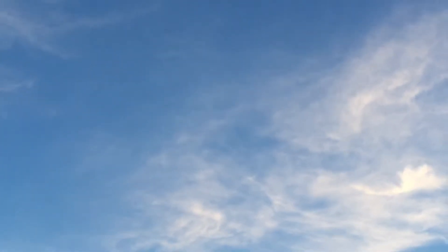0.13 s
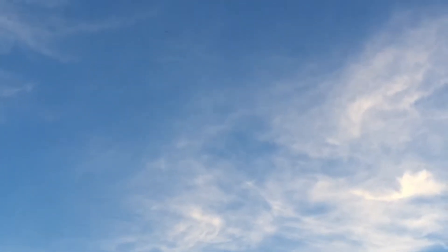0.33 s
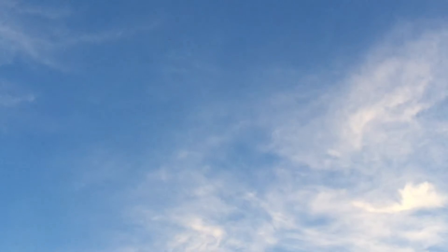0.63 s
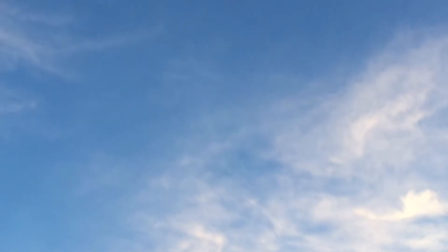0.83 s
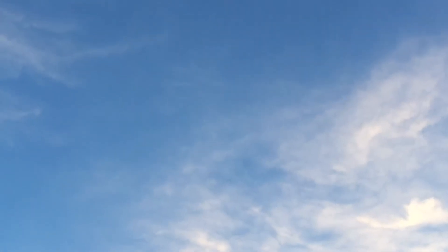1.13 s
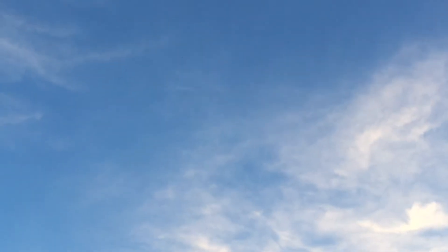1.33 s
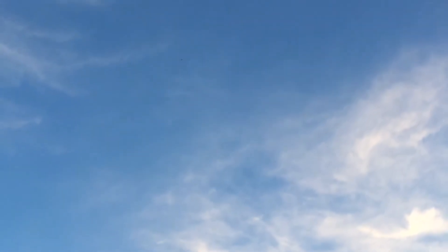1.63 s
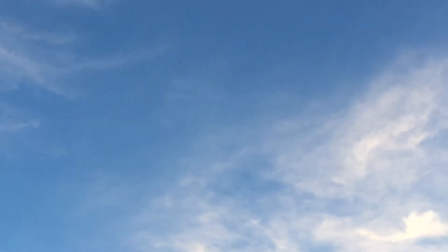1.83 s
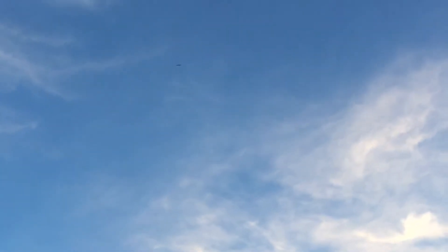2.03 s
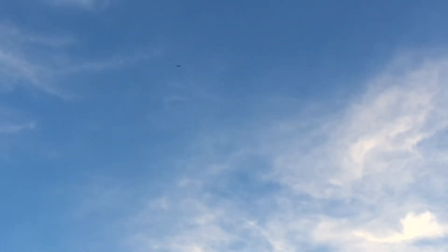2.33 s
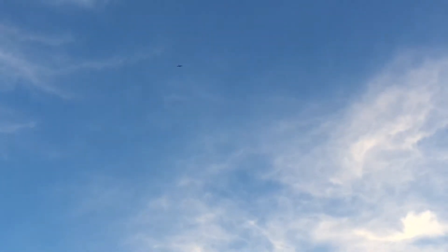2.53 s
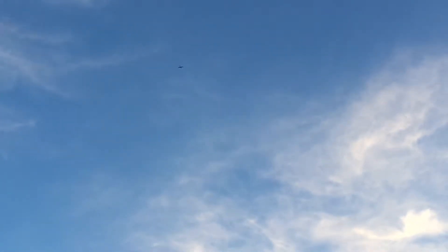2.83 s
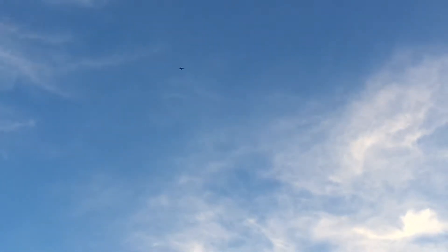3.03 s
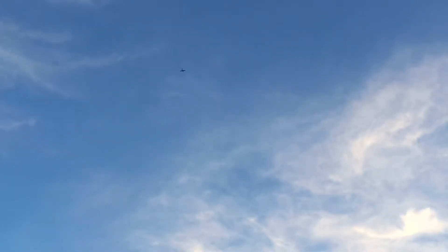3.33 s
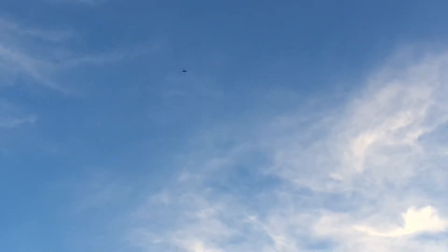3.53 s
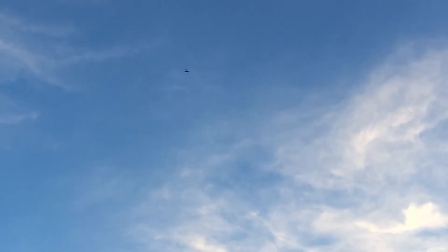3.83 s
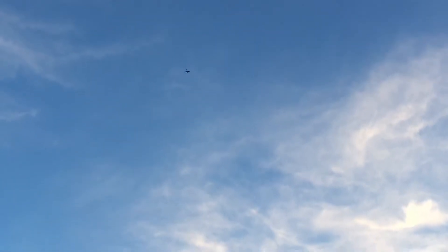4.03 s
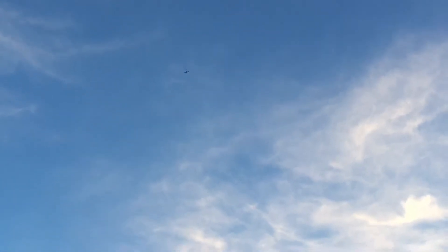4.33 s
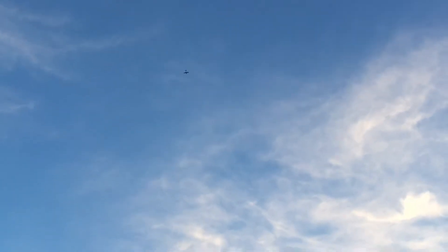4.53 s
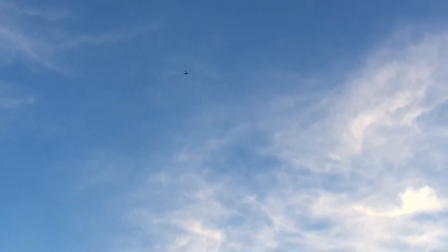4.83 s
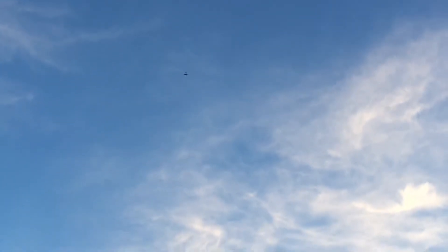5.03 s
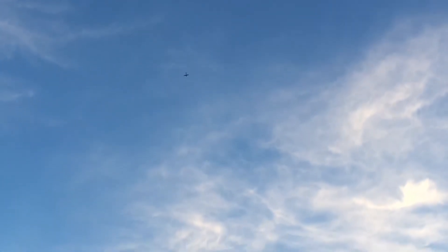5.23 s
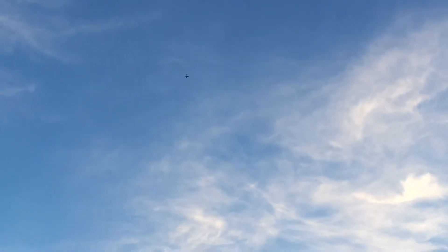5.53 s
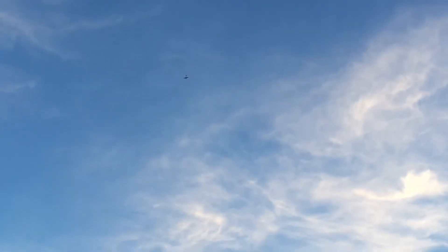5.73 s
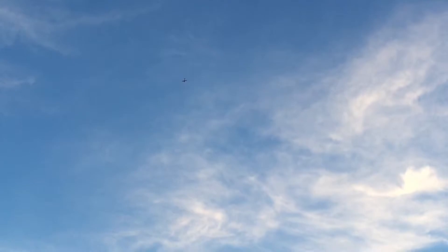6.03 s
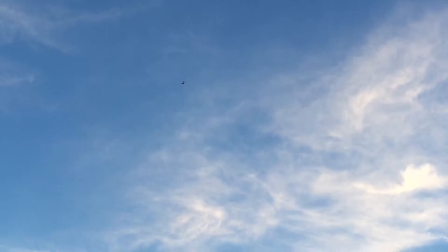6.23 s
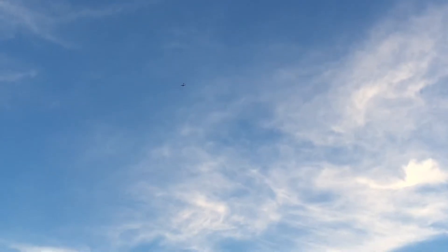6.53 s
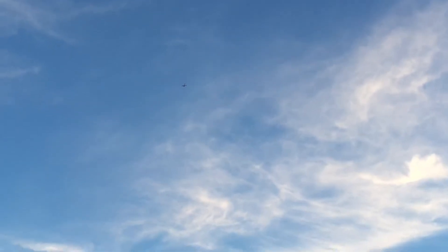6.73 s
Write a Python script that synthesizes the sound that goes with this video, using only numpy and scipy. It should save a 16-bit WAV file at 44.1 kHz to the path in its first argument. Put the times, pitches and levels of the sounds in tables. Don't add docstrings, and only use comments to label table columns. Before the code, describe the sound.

A light propeller aircraft is already droning high overhead at 0 s, heard from a quiet open field by one microphone. The low buzzing hum, around 129 firings per second, slides down smoothly to about 100 by 3 s. Propeller beating and exhaust blend into one continuous, slightly rough tone that flickers through the long air path. A thin, chirping whistle near 3.5 kHz rides on it, clearest in the first second or so and gone by about 2.4 s. Raspy exhaust crackle swells from 1.4 to 2.3 s, stays patchy and increasingly dull until about 4.5 s, then drops away. Pitch bottoms near 4 s and rises slightly to about 105 by the end at 6.9 s. The late drone is softer, smoother and muffled, with a low airframe rush slowly fading and faint steady hiss beneath. It is still sounding when it ends.

```python
import sys
import numpy as np
from scipy import signal
from scipy.fft import rfft, irfft, next_fast_len
from scipy.io import wavfile
from scipy.ndimage import uniform_filter1d

SR = 44100
rng = np.random.default_rng(int(sys.argv[2]) if len(sys.argv) > 2 else 0)


def wrap_up_sound(samples):
    columns = np.atleast_2d(samples).T
    tamed = np.clip(columns, -1, 1)
    steps = np.round(tamed * 32767).astype(np.int16)
    wavfile.write(sys.argv[1], SR, steps)


def volts_from_decibels(level):
    exponent = np.asarray(level, float) / 20
    return 10 ** exponent


N = 303400
T = np.arange(N) / SR
PADDED = next_fast_len(N)
HZ = np.fft.rfftfreq(PADDED, 1 / SR)

# (time [s], heard
# firing rate [Hz])
FIRING_RATE = [(0, 128.6), (.6, 120.05), (1.2, 112.45), (1.5, 109.1), (1.8, 106.2), (2.1, 103.8),
               (2.4, 102.1), (2.7, 100.9), (3, 100.05), (3.6, 98.75), (3.9, 98.6), (4.2, 98.7),
               (4.8, 99.55), (5.4, 100.85), (6, 102.25), (6.88, 105)]

# (time [s], blade tone [dB], edge of its second multiple [dB])
PROPELLER = [(0, -39.5, -16), (.2, -38.5, -4.5), (.6, -44, 1.5), (.85, -45.5, 8), (1.5, -45, 2.5),
             (1.8, -43, 1), (2.15, -43, -5.5), (2.5, -41, -18), (2.9, -40.5, -4), (3.4, -47.5, -3.5),
             (3.65, -47, -29), (4.4, -47, -15), (4.6, -46, -14), (5.2, -48, -11), (6, -46, -22.5),
             (6.2, -44, -13), (6.4, -39.5, -25.5), (6.88, -40.5, -21)]
# (order [per engine cycle], level followed [index], level against it [dB], flicker [dB])
BLADE_ORDERS = [
    (4, 0, 0.5, 0.5),
    (8, 1, 0.5, 4.5),
    (16, 2, 1, 2.5),
    (20, 1.4, -18, 7),
    (10, 0, -22, 4),
    (5, 0, -17, 2),
]
# (time [s], lead [firings])
BLADE_LEAD = [
    (0, .41),
    (2, -.12),
    (6.88, -.12),
]
# (time [s], length [s], level [dB])
FOURTH_BEATS = [(1.4, 0.9, 10.5), (2.4, 0.12, -3.5), (2.75, 0.16, 10.5), (3.1, 0.22, -14), (4.2, .3, 5),
                (5, 0.23, 8.5), (5.6, 0.21, 6.5), (6.05, 0.17, 6)]
FOURTH_DB, FOURTH_SHARE = -8, 0.25

# (time [s], firing tone [dB])
DRONE = [(0, -36.5), (.2, -36.5), (.4, -33), (.6, -36.5), (1, -36.5), (1.4, -31.5), (1.6, -35.5),
         (1.9, -34), (2.2, -33), (2.6, -35), (3.4, -35), (4.2, -37), (4.8, -38), (5.6, -45), (5.8, -44),
         (6.2, -44), (6.4, -39.5), (6.88, -39.5)]
# (order [per engine cycle], level followed [index], level against it [dB], flicker [dB])
STACK_ORDERS = [(6, 0, 0.5, 0.77), (9.3, 0, -13.5, 0.97), (7, 1.5, -28.5, 4.9), (15.3, 1, -1.5, 1.7),
                (14, 1.5, -13.5, 1.4), (12, 2, -0.5, 0.52), (17.9, 3, -1, 1.6), (21, 4, 1.5, 3.8),
                (23.56, 3, -2.5, 1.4), (22, 3, -14.5, 4.4), (27.48, 4, -1.5, 1.2), (30.57, 3, -8.5, 3),
                (33.56, 3, -13, 2.2), (36, 1.5, -16, 2.5), (39, 3, -18.5, 2.8)]
# (time [s], length [s], level [dB])
SECOND_BEATS = [(.15, 0.21, 11.5), (.9, 0.33, -26), (1.95, 0.18, 13.5), (2.75, 0.22, 9.5), (3.3, 0.23, 6.5),
                (3.6, 0.07, -4), (4, 0.22, 8.5), (5.3, 0.47, 6), (6.5, 0.51, -0.5)]
# (time [s], length [s], level [dB])
HIGHER_BEATS = [(.1, .3, -10), (.65, .25, -24), (1.15, 0.24, -6.5), (2, 0.065, 3.5), (2.75, 0.16, 1.5),
                (3.4, 0.095, -2), (5, 0.41, 5), (5.6, 0.24, 8.5), (6, 0.19, -21), (6.7, .3, 10)]
# (time [s], length [s], level [dB])
ODD_BEATS = [
    (2.2, .15, -12.5),
    (3.8, .9, -13),
    (6.2, 0.25, -37),
]
BEAT_DB, BEAT_DRONE, BEAT_CRACKLE = -12.5, 0.49, 0.34
SECOND_DB = -16
HIGHER_DB, ODD_DB = -7.5, -12.5

# (time [s], crackle [dB], treble left by the air path [dB])
CRACKLE = [(0, -42.5, -17.5), (.3, -51.5, -12), (.8, -43.5, -17), (1.2, -47, -8.5), (1.5, -37, -18.5),
           (1.9, -37.5, -17.5), (2.15, -35.5, -13.5), (2.4, -41.5, -12), (2.6, -43.5, -9), (3.1, -39, -27),
           (3.5, -46, -15), (4.1, -42.5, -29), (4.45, -44.5, -30), (4.7, -51, -22), (5.1, -55, -21),
           (5.55, -63.5, -20.5), (6.2, -69, -12), (6.88, -67, -31)]
# (level against the crackle [dB], share of the treble control [dB/dB])
CRACK_RULE = [
    (1.13, 0.056),
    (-2.5, 0.027),
    (1.5, 0.59),
    (-0.33, 1),
]
# (from [Hz], centre [Hz], to [Hz], puff decay [ms], click share [0-1],
# strength of each cylinder [dB])
CRACK_BANDS = [
    (340, 570, 842, 14, 0.58, (-3, -0.5, -1.5, -2.5, -1.5, -6.5)),
    (590, 953, 1365, 2.3, 0.64, (1, -1.5, 0, -0.5, 4.5, -1.5)),
    (1020, 1403, 2620, 5.9, 0.51, (2, -2, 1.4, -1, 3.1, -1.5)),
    (1717, 2580, 4620, 6.1, 0.17, (0.5, -0.5, -6, -5, -6.5, -0.5)),
]
# (time [s], share [0-1])
ASPECT = [(0, 0), (1, 0.58), (1.5, 0.62), (1.95, 0.78), (2.35, 0.66), (2.8, 0.69), (3.5, 0.74), (4.3, 0.64),
          (5, 0), (6.88, 0.65)]
# (frequency [Hz], width [Hz], level [dB])
PIPE = [(636, 200, 2), (862, 83, 4), (993, 37, 3.5), (1364, 225, 5.5), (2260, 250, 3.5), (3300, 97, 2.5)]
REPEAT = 0.55

# (time [s], length [s], centre [Hz], # level
# [dB])
CRACKLE_PATCHES = [(1.785, 0.31, 1230, 10.5), (2.294, 0.15, 920, -13.5), (4.6, 0.096, 1230, 10.5),
                   (4.85, 0.11, 2600, 3.5), (3.6, 0.15, 960, 16), (2.31, 0.14, 3150, -8.5), (1.517, 0.045, 2650, 8),
                   (1.55, 0.19, 1450, -13), (4.55, 0.059, 1220, -13.5), (3.01, 0.16, 470, -3.5),
                   (0.0, 0.25, 520.0, -4), (0.01, 0.045, 2680, -11), (0.2, 0.22, 1490, 7),
                         (0.626, 0.087, 2230, -7.4), (0.93, 0.1, 1480, 5), (1.117, 0.16, 2120, -5.5),
                         (1.15, 0.1, 540, 4), (2.507, 0.26, 1190.0, 4.5), (2.577, 0.19, 1970, 6.5),
                         (2.8, 0.44, 3380, -12), (2.876, 0.27, 530, -0.5), (3.07, 0.1, 2000, 9.5),
                         (3.37, 0.21, 450, 6), (3.578, 0.13, 810, -7), (3.627, 0.17, 1730, -9.1),
                         (4.118, 0.1, 1920, -9), (4.142, 0.13, 980, 6), (5.544, 0.086, 960.0, 5),
                         (5.935, 0.19, 735, -2), (6.447, 0.11, 630, 6)]
PATCH_OCTAVES = 0.56
ABEAM_S, BANK_DELAY_S_PER_S = 1.905, 0.002185
BANK_MATCH, BANK_SPAN_S, BANK_FULL_HZ = 0.6, 0.6, 2000

# (time [s], level against the sizzle [dB], pitch [Hz])
WHISTLE = [
    (0, 0, 3700),
    (.6, -6, 3600),
    (1, 7.5, 3400),
    (1.3, -4.5, 3300),
    (1.8, -5, 3300),
    (2.1, -8, 3100),
    (2.4, -22, 3000),
    (6.88, -36, 3000),
]

# (frequency [Hz], level [dB per Hz])
RUSH = [(20, -14), (45, -10.5), (60, -1.5), (150, 0), (300, -1.5), (430, -8.5), (520, -45.5), (800, -92)]
RUSH_DB, RUSH_FALL_DB_PER_S = -43.5, 2.6
# (frequency [Hz], level [dB per Hz])
HISS = [(20, 6.5), (300, 1.5), (1000, 2), (2500, 5), (4500, 2.5), (4900, -0.5), (5500, 2), (6700, 1),
        (7700, -2), (9000, -0.5), (10000, -2.5), (10500, -6.5), (11200, -2.5), (15500, -5)]
HISS_DB = -74


def evened(x):
    return x / np.sqrt(np.mean(x ** 2) + 1e-20)


def curves(rows):
    s, *columns = np.transpose(rows)
    return [np.interp(T, s, column) for column in columns]


def swells(rows):
    return sum(db * np.exp(-((T - s) / length) ** 2) for s, length, db in rows)


def wander(top_hz, step=10):
    s = np.arange(0, T[-1] + 0.02, 0.01)
    rates = np.geomspace(0.3, top_hz, 16)[:, None]
    sines = np.sin(2 * np.pi * (rates * s + rng.random(rates.shape)))
    slow = (sines / np.sqrt(rates)).sum(0)
    return np.interp(T[::step], s, evened(slow))


def shaped(x, gain):
    return evened(irfft(rfft(x, PADDED) * gain, PADDED)[:N])


def coloured(points):
    hz, db = np.transpose(points)
    return shaped(rng.standard_normal(N), volts_from_decibels(np.interp(np.log(HZ + 1), np.log(hz), db)))


def band(x, low_hz, mid_hz, high_hz):
    place = np.interp(np.log(HZ + 1), np.log([low_hz, mid_hz, high_hz]), [0, 1, 0])
    return shaped(x, np.sin(place * np.pi / 2) ** 2)


def tones(firings, orders, levels, family):
    coarse = 10
    firings = firings[::coarse]
    levels = [level[::coarse] for level in levels]
    out = 0
    for order, follows, db, flicker_db in orders:
        k = round(order)
        lag = 0.38 if k == 6 else 0.1
        start = rng.random() * (k % family > 0) - lag
        sway = 0.03 * order * wander(5)
        angle = 2 * np.pi * (firings * k / 6 + start) + sway
        level_db = levels[round(follows)] + db + flicker_db * wander(7.4)
        out = out + np.sqrt(2) * volts_from_decibels(level_db) * np.cos(angle)
    return signal.resample_poly(out, coarse, 1, padtype="line")[:N]


def propeller(firings):
    tone, edge = curves(PROPELLER)
    fourth = tone + FOURTH_DB + FOURTH_SHARE * edge + swells(FOURTH_BEATS)
    return tones(firings + curves(BLADE_LEAD)[0], BLADE_ORDERS, (tone, tone + edge, fourth), family=4)


def exhaust_drone(firings):
    drone, crackle = curves(DRONE)[0], curves(CRACKLE)[0]
    one_bank = BEAT_DB + BEAT_DRONE * drone + BEAT_CRACKLE * crackle
    second = drone + SECOND_DB + swells(SECOND_BEATS)
    higher = crackle + HIGHER_DB + swells(HIGHER_BEATS)
    odd = crackle + ODD_DB + swells(ODD_BEATS)
    return tones(firings + 1, STACK_ORDERS, (drone, one_bank, second, higher, odd), family=3)


def crack_levels():
    crackle, treble = curves(CRACKLE)
    return [crackle + db + share * treble for db, share in CRACK_RULE]


def gas_flow(firings):
    cycle, steps = firings / 6, 1024
    fresh = rng.standard_normal((int(cycle[-1]) + 12, steps))
    flow = signal.lfilter([1], [1, -REPEAT], fresh, axis=0)[10:].ravel()
    return evened(np.interp(cycle * steps, np.arange(len(flow)), flow))


def cracks(firings):
    fired = curves(ASPECT)[0]
    at = np.flatnonzero(np.diff(np.floor(firings)))
    late, size = rng.standard_normal((len(at), 2)).T
    cylinder = np.floor(firings[at]).astype(int) % 6
    at = np.clip(at + np.round(late * 0.00006 * SR).astype(int), 0, N - 1)
    gas, steady = gas_flow(firings), gas_flow(firings)
    out = np.zeros(N)
    for (*edges, puff_ms, sharp, strength_db), level_db in zip(CRACK_BANDS, crack_levels()):
        clicks = np.zeros(N)
        clicks[at] = -volts_from_decibels(np.array(strength_db)[cylinder] + 1.8 * size)
        puff_decay = np.exp(-1000 / (puff_ms * SR))
        puffs = signal.lfilter([1], [1, -puff_decay], clicks) * gas
        crack = np.sqrt(sharp) * band(clicks, *edges) + np.sqrt(1 - sharp) * band(puffs, *edges)
        rush = band(steady, *edges)
        out += volts_from_decibels(level_db) * (np.sqrt(fired) * crack + np.sqrt(1 - fired) * rush)
    for hz, width, db in PIPE:
        out = out + (volts_from_decibels(db) - 1) * signal.lfilter(*signal.iirpeak(hz, hz / width, SR), out)
    return volts_from_decibels(-4.5) * turbulence(out, patchy_db=2.0, gusty_db=2.53)


def bank_interference(hz, s):
    in_step = np.exp(-((s - ABEAM_S + 0.16) / BANK_SPAN_S) ** 4)
    other = BANK_MATCH * in_step * np.minimum(hz / BANK_FULL_HZ, 1)
    delay_s = BANK_DELAY_S_PER_S * (s - ABEAM_S)
    return abs(1 + other * np.exp(2j * np.pi * hz * delay_s)) / np.sqrt(1 + other ** 2)


def turbulence(x, patchy_db, gusty_db):
    bins = 80
    hz, s, z = signal.stft(x, SR, nperseg=512, noverlap=384)
    hz, z = hz[:bins, None], z[:bins]
    field = rng.standard_normal(z.shape)
    patches = evened(uniform_filter1d(uniform_filter1d(field, size=2, axis=0), size=80, axis=1))
    gusts = evened(uniform_filter1d(uniform_filter1d(field, size=4, axis=0), size=10, axis=1))
    broad_patches = 0
    for at, length, mid_hz, db in CRACKLE_PATCHES:
        octaves = np.log2((hz + 1) / mid_hz)
        broad_patches = broad_patches + db * np.exp(-((s - at) / length) ** 2 - (octaves / PATCH_OCTAVES) ** 2)
    flicker_db = broad_patches + patchy_db * patches + gusty_db * gusts * hz / 2000
    z = z * bank_interference(hz, s) * volts_from_decibels(flicker_db)
    z = np.pad(z, ((0, 257 - bins), (0, 0)))
    return signal.istft(z, nperseg=512, noverlap=384)[1][:N]


def whistle(firings):
    against_db, hz = curves(WHISTLE)
    cycle = (firings / 6).astype(int)
    detune, size = rng.standard_normal((cycle[-1] + 1, 2))[cycle].T
    stroke = np.exp(-((firings % 6 - 1.3) / 0.45) ** 2)
    tone = np.sin(2 * np.pi * np.cumsum(hz * (1 + 0.06 * detune)) / SR)
    return volts_from_decibels(crack_levels()[3] + against_db + 4 * size) * stroke * tone


def air_path(x):
    return signal.sosfiltfilt(signal.butter(4, 4500, fs=SR, output="sos"), x)


def airframe_rush():
    level_db = RUSH_DB - RUSH_FALL_DB_PER_S * T + 1.5 * wander(3.4, step=1)
    return volts_from_decibels(level_db) * coloured(RUSH)


def field_hiss():
    return volts_from_decibels(HISS_DB) * coloured(HISS)


def scene():
    firings = np.cumsum(curves(FIRING_RATE)[0]) / SR + 6.0
    engine = propeller(firings) + exhaust_drone(firings)
    engine += cracks(firings - 0.18)
    engine += whistle(firings)
    return (air_path(engine) + airframe_rush() + field_hiss())[None]


def top_cut(x):
    return signal.sosfilt(signal.butter(12, 15720, fs=SR, output="sos"), x)


def record(dry):
    return top_cut(dry)


dry = scene()
out = record(dry)
wrap_up_sound(out)
```